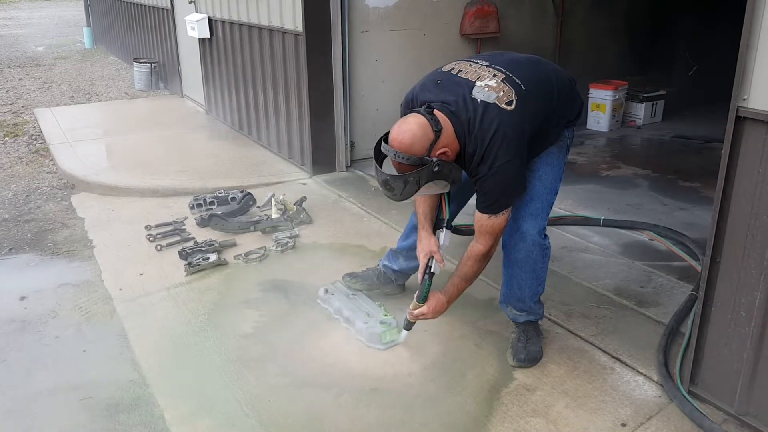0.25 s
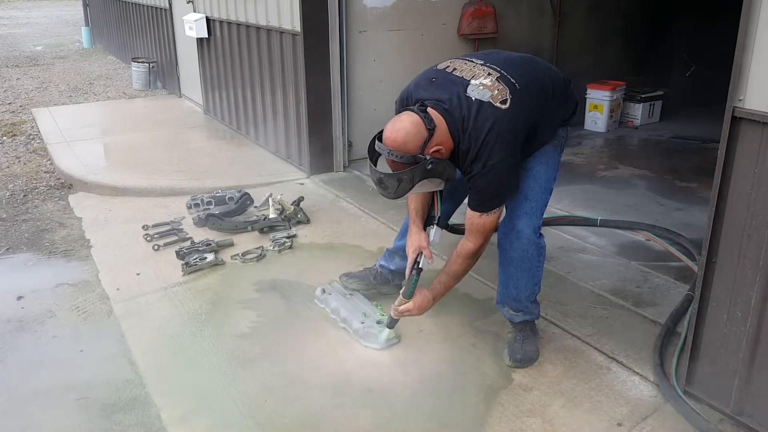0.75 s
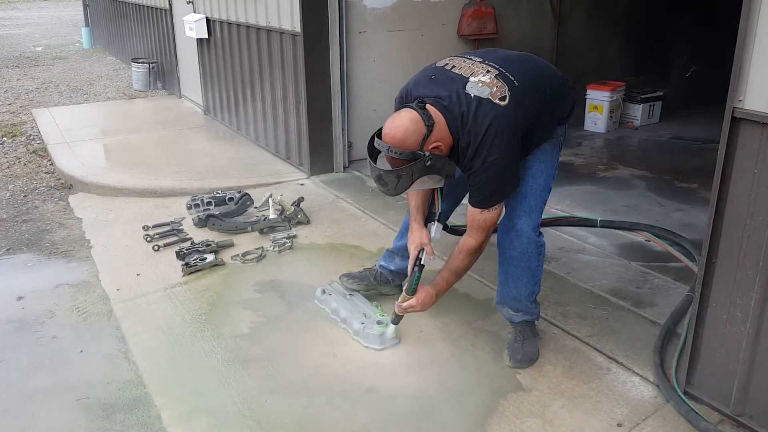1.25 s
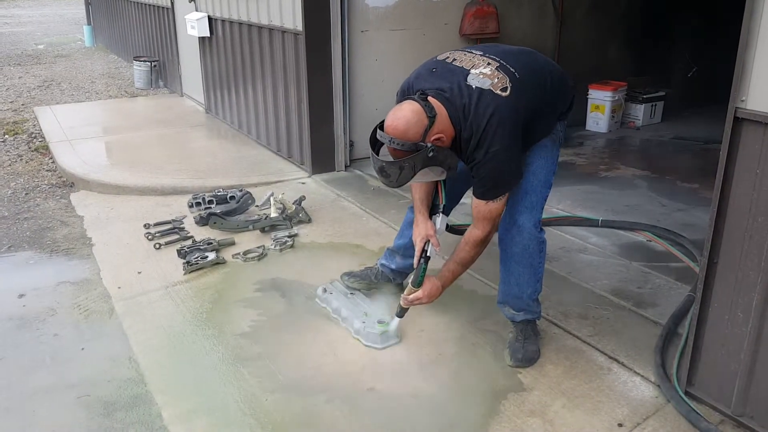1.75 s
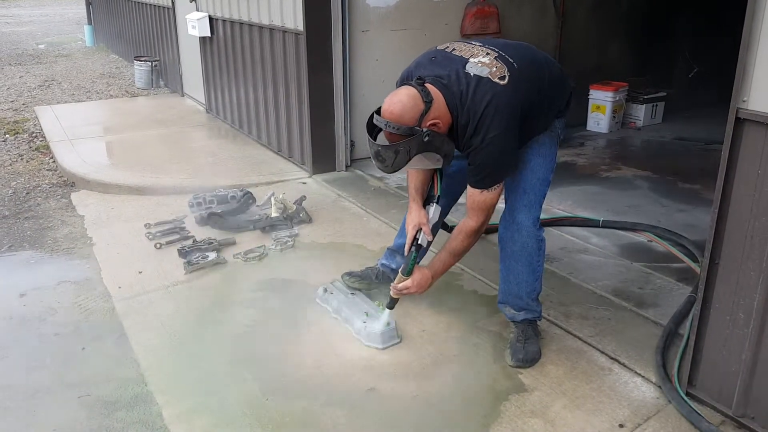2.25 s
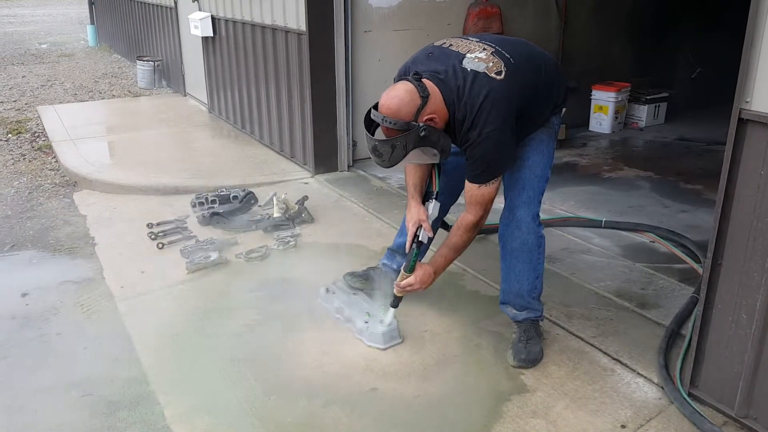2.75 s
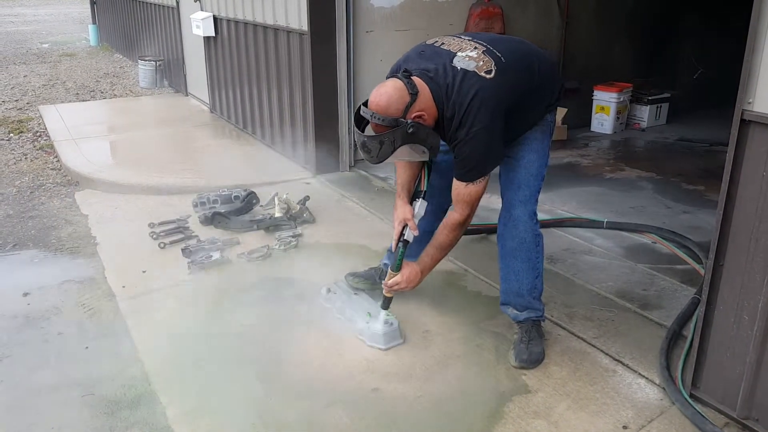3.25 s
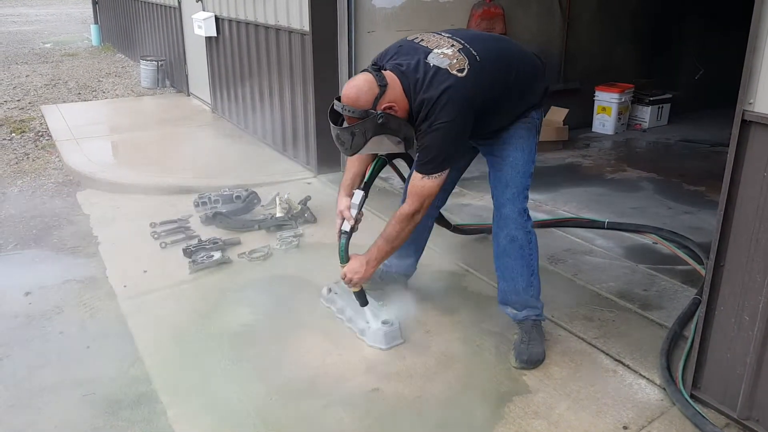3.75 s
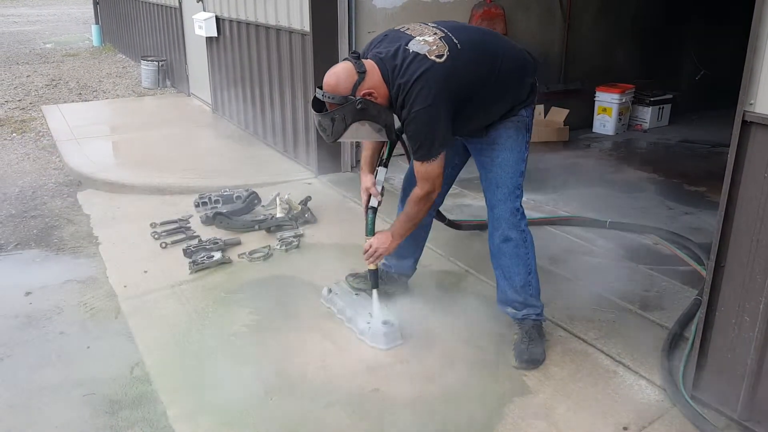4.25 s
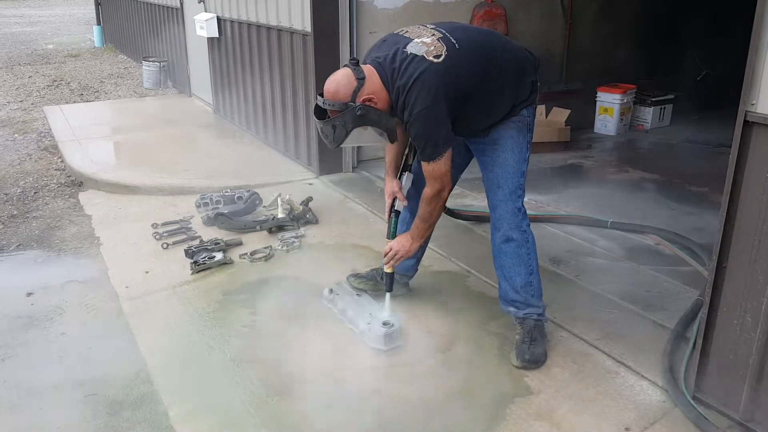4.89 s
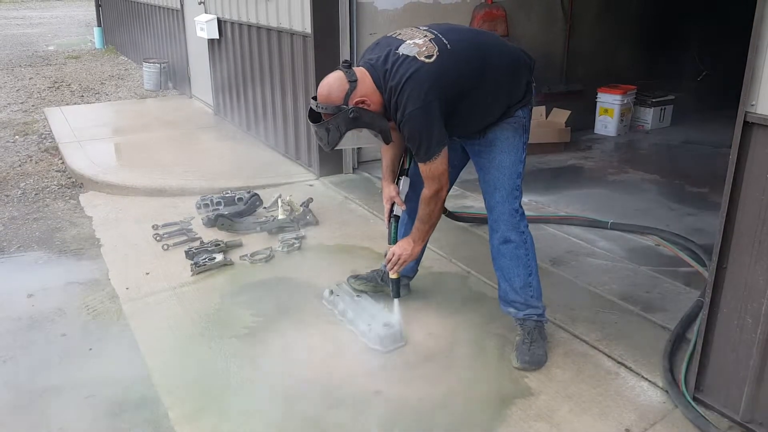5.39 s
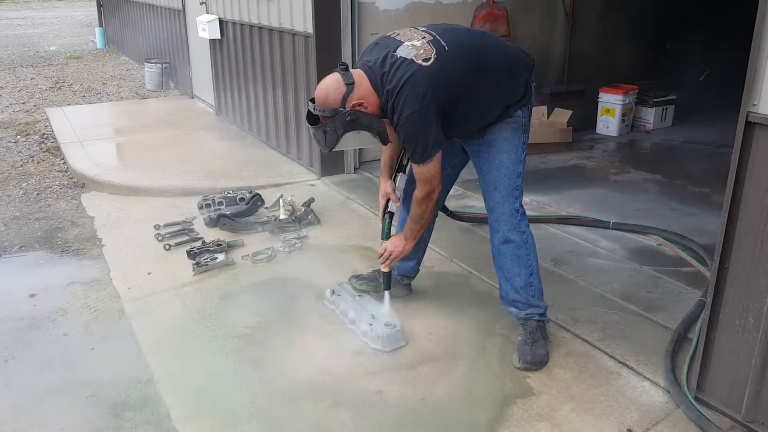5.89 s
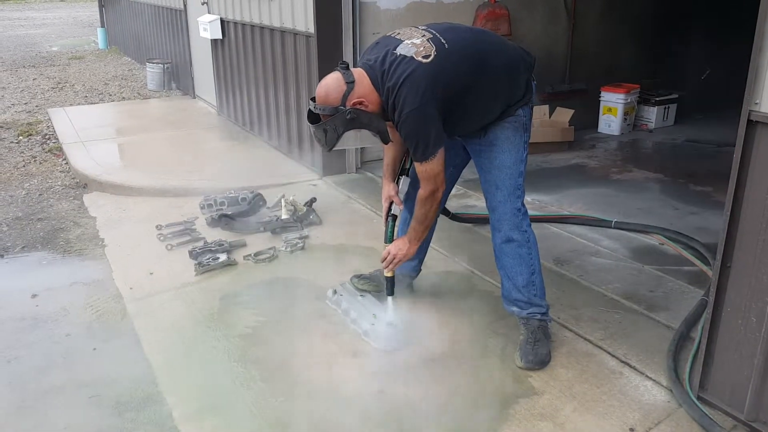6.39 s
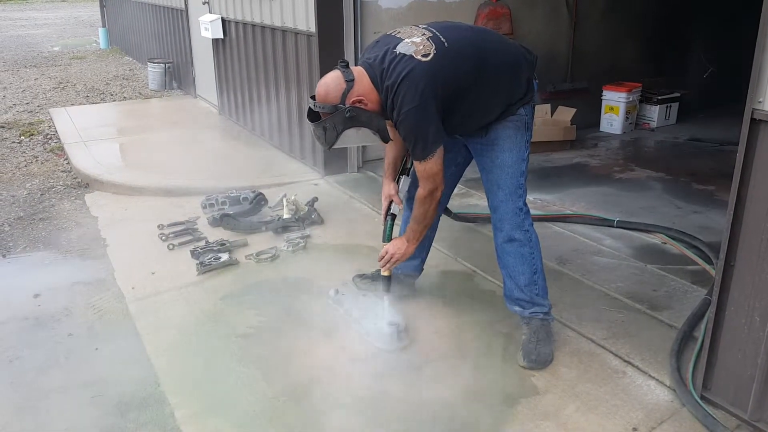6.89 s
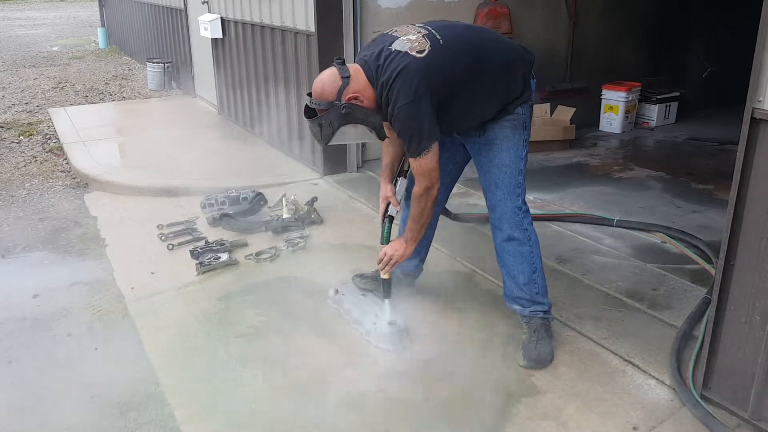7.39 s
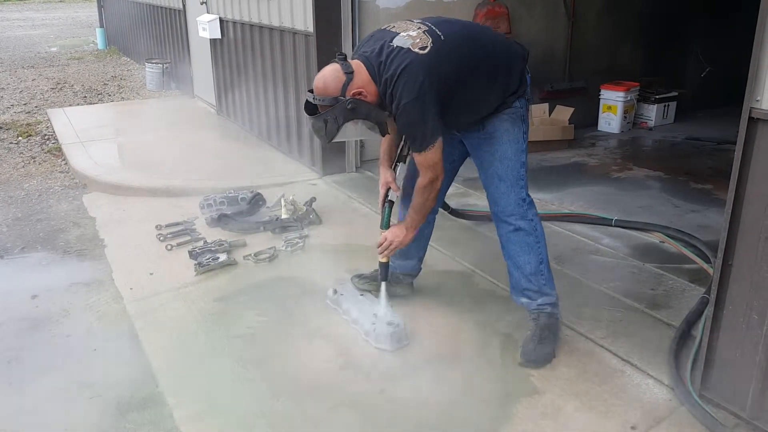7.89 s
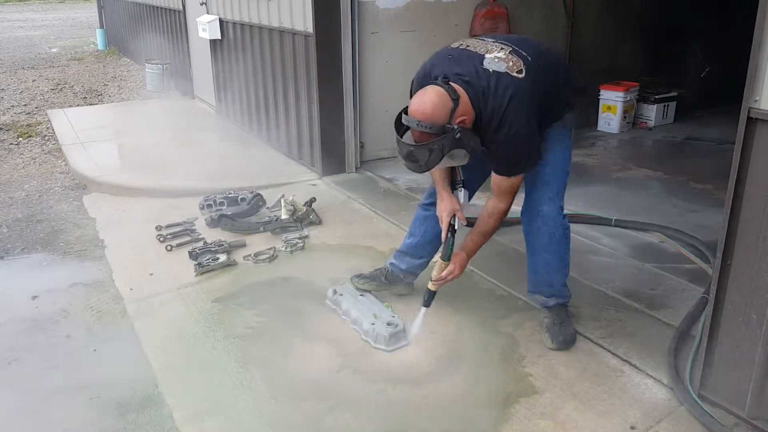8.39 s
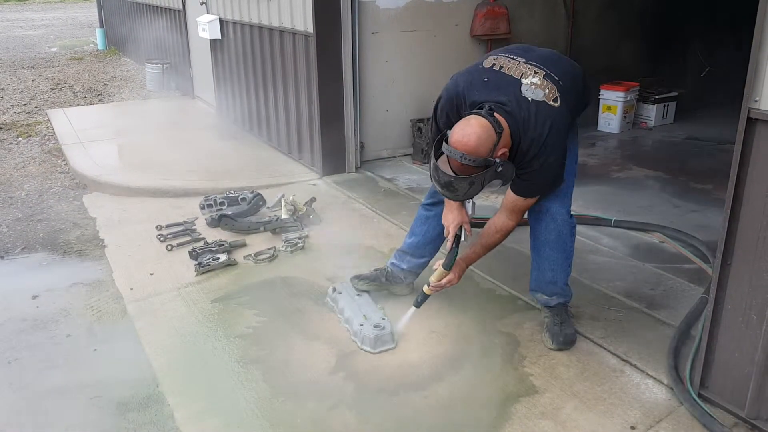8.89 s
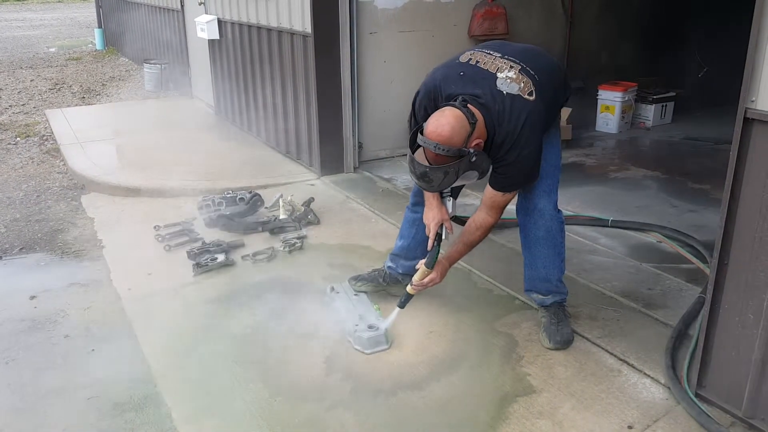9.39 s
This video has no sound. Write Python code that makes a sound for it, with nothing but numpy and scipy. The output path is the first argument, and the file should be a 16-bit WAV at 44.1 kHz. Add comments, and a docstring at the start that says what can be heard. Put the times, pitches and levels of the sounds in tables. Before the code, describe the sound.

A wet abrasive blaster screams in a harsh, wavering high hiss, swooping downward again and again over a lumpy roar and fine grit sizzle.

```python
"""The scream of a wet abrasive blaster leads, its jet on a cast metal cover on concrete outside a workshop.
Noise passes only above the bore's cut-on, a sharp edge that water in the bore pulls down; slugs choke it.
Under it lumpy noise roars on the part and the ground; on top random ticks of grit and droplets sizzle.
Place and microphone: outdoors, no distance or echo computed, the jet on the right channel only.
A faint preamplifier hiss lies on both channels, and the top is cut."""
import sys
import numpy as np
from scipy import signal
from scipy.fft import rfft, irfft
from scipy.io import wavfile
from scipy.ndimage import map_coordinates

SR = 44100
rng = np.random.default_rng(int(sys.argv[2]) if len(sys.argv) > 2 else 0)


def transcribe(signal):
    """Save signal, clipped to [-1, 1], as a 16-bit WAV file at the path in sys.argv[1]."""
    frames = np.atleast_2d(signal).T
    limited = np.clip(frames, -1, 1)
    pcm = np.round(limited * 32767).astype(np.int16)
    wavfile.write(sys.argv[1], SR, pcm)


N = 425124
T = np.arange(N) / SR
FRAME, OVERLAP = 512, 384  # samples, for the moving filters
FREQS, TIMES, _ = signal.stft(np.zeros(N), SR, nperseg=FRAME, noverlap=OVERLAP)


def undb(db):
    """Decibels to gain."""
    return 10 ** (np.asarray(db) / 20)


def curve(table, times, axis=1):
    """One column of a table, joined by straight lines in time."""
    rows = np.array(table)
    return np.interp(times, rows[:, 0], rows[:, axis])


def colour(x, points):
    """Filter by a spectrum of (f/Hz, level/dB) points, joined along log frequency."""
    hz, db = np.transpose(points)
    freqs = np.maximum(np.fft.rfftfreq(N, 1 / SR), 1)
    gain = undb(np.interp(np.log(freqs), np.log(hz), db))
    return irfft(rfft(x) * gain, N)


def sweep(x, gain):
    """A filter that moves: gain is given over FREQS and TIMES."""
    frames = signal.stft(x, SR, nperseg=FRAME, noverlap=OVERLAP)[2]
    return signal.istft(frames * gain, SR, nperseg=FRAME, noverlap=OVERLAP)[1][:N]


def unit(x, band):
    """Scale to rms 1 within a band (low Hz, high Hz)."""
    freqs = np.fft.rfftfreq(N, 1 / SR)
    inside = (freqs > band[0]) & (freqs < band[1])
    return x / np.std(irfft(rfft(x) * inside, N))


def walk(rate):
    """Random wavering in time, spread 1: noise above 2 Hz that falls off beyond rate (Hz)."""
    freqs = np.fft.rfftfreq(N, 1 / SR)
    response = (freqs > 2) / np.hypot(1, freqs / rate)
    x = irfft(rfft(rng.standard_normal(N)) * response, N)
    return x / x.std()


def ripple(width_hz, rate):
    """Peaks and dips across the spectrum that come and go, spread near 1."""
    place = np.meshgrid(FREQS / width_hz, TIMES * rate, indexing="ij")
    return map_coordinates(rng.standard_normal((256, 512)), place, order=3, mode="wrap")


def bell(hz, width_hz):
    """Shape of a resonance over FREQS, 1 at its centre, which may move."""
    return 1 / (1 + (2 * (FREQS[:, None] - hz) / width_hz) ** 2)


def resonances(table):
    """Change in dB over FREQS and TIMES of peaks or dips that each fade in and out."""
    change_db = 0
    for start, end, hz, width_hz, db in table:
        inside = np.clip(np.minimum(TIMES - start, end - TIMES) / 0.26, 0, 1)  # 0.26 s fades
        change_db = change_db + db * inside * bell(hz, width_hz)
    return change_db


def hump(times, at_s, length_s, power=2):
    """A smooth rise and fall in time, 1 at its middle and 1/e at length_s to either side."""
    return np.exp(-np.abs((times - at_s) / length_s) ** power)


# turbulence at the nozzle, before bore and resonances: f/Hz, relative level/dB
SCREAM_SPECTRUM = [(2800, 0.5), (3800, -1.5), (4500, -3.5), (5100, -1.5), (5900, -0.66), (6700, 0.2),
                   (7050, -3), (7500, -6.5), (7950, -11.5), (8450, -11.5), (9100, -15.5), (10000, -34),
                   (12000, -44)]
# gap between nozzle and part, resonating with the aim: from t/s, to t/s, f/Hz, width/Hz, change of level/dB
GAP_RESONANCES = [(0, 8.2, 6600, 260, 0.5), (0, 12, 5520, 140, 2.5), (.55, 2.1, 5880, 140, 5.5),
                  (2.05, 2.9, 5780, 170, 3.5), (2.4, 3.2, 5490, 120, 5), (3.5, 4.9, 6600, 350, 0),
                  (8.3, 8.8, 6950, 600, 6), (8.9, 9.8, 5770, 340, 5.5)]
# slugs of water that choke the nozzle: t/s, half length/s, change of level/dB
WATER_SLUGS = [(3.541, .002, -17), (3.552, .0057, -9.5), (4.907, .0058, -22), (6.768, 0.0059, -15),
               (8.397, .0054, -17), (9.157, .0056, -19)]


def scream(cut_on, grit_db):
    """Turbulence in the nozzle; the bore passes it only above the cut-on of its first cross mode."""
    turbulence = colour(rng.standard_normal(N), SCREAM_SPECTRUM)
    above_hz = FREQS[:, None] - cut_on
    passes = .5 + .5 * np.tanh(above_hz / 28)

    # the mode rings hardest just above its cut-on, and whistles there in short spells
    spells = undb(6.8 * np.interp(TIMES, T, walk(rate=6.5)))
    whistle_db = 2.34 * np.minimum(spells, 2) * bell(cut_on + 70, width_hz=200)

    # a higher cut-on and more grit both lift the upper skirt
    skirt_db = 7 * np.log(cut_on / cut_on.mean()) + 0.68 * (grit_db - grit_db.mean())
    ring_db = whistle_db + resonances(GAP_RESONANCES) + skirt_db * bell(hz=8350, width_hz=1600)

    # reflections from the part and the ground shift as the nozzle is moved
    shift_db = 1.15 * ripple(width_hz=130, rate=3.5)
    x = sweep(turbulence, passes * undb(ring_db + shift_db))

    # the oscillation saturates, which evens out its peaks
    wave = signal.hilbert(x / x.std())
    x = wave.real / np.sqrt(1 + 0.12 * np.abs(wave) ** 2)
    choke_db = sum(db * hump(T, s, length, power=2.8) for s, length, db in WATER_SLUGS)
    return unit(x, band=(4600, 7500)) * undb(choke_db)


# the clear bore's cut-on before it trembles; a surge pulls it down, sharply (1) or roundly (2)
CLEAR_HZ, SURGE_SHAPE = 4480, 1.31
# surges of water, each a downward swoop of the scream: t/s, drop of the cut-on f/Hz, half length/s
WATER_SURGES = [(0.005, 1490.0, 0.037), (0.101, 1490.0, 0.083), (0.32, 1380, 0.07), (0.443, 750.0, 0.036),
                (0.513, 1320, 0.11), (0.834, 1180.0, 0.1), (1.015, 760.0, 0.049), (1.147, 1350, 0.089),
                (1.28, 840.0, 0.12), (1.668, 900, 0.18), (1.808, 950.0, 0.078), (2.094, 900.0, 0.079),
                (2.368, 700, 0.17), (2.49, 440.0, 0.043), (2.754, 905, 0.118), (2.918, 360.0, 0.049),
                (3.073, 630.0, 0.055), (3.165, 590.0, 0.033), (3.314, 1040, 0.12), (3.682, 510.0, 0.056),
                (3.818, 710.0, 0.023), (3.933, 676, 0.16), (4.195, 1280.0, 0.08), (4.46, 680.0, 0.035),
                (4.644, 865, 0.075), (4.925, 400.0, 0.024), (5.163, 990, 0.061), (5.442, 710.0, 0.099),
                (5.579, 720.0, 0.12), (5.755, 580.0, 0.057), (5.941, 920, 0.17), (6.279, 1490.0, 0.11),
                (6.52, 1050.0, 0.071), (6.737, 1270, 0.086), (7.005, 1020.0, 0.062), (7.186, 1130.0, 0.082),
                (7.606, 463, 0.066), (7.718, 1270, 0.068), (7.979, 280.0, 0.078), (8.078, 290.0, 0.051),
                (8.36, 670.0, 0.048), (8.63, 1180, 0.067), (8.757, 430.0, 0.036), (9.016, 300.0, 0.023),
                (9.123, 340.0, 0.11), (9.464, 430.0, 0.049), (9.607, 670.0, 0.067)]


def bore():
    """Cut-on of the nozzle in Hz over TIMES: each surge lowers it, and the water film makes it tremble."""
    drop_hz = sum(hz * hump(TIMES, s, length, SURGE_SHAPE) for s, hz, length in WATER_SURGES)
    tremble = 1 + .009 * np.interp(TIMES, T, walk(rate=20))
    return (CLEAR_HZ - drop_hz) * tremble


# air and water striking the part and the ground: f/Hz, relative level/dB
ROAR_SPECTRUM = [(25, -38), (45, -33), (70, -17), (110, -8.5), (160, -2.5), (290, -2.5), (400, 0),
                 (800, -2), (1400, -4.5), (2400, -5), (3000, -1.5), (4000, -4), (9000, -10.5)]
# tones of the part that swell or dip in the roar: from t/s, to t/s, f/Hz, width/Hz, change of level/dB
PART_TONES = [(3.55, 4.35, 2210, 220, 7), (7.6, 8.4, 2720, 350, 4.5), (7.9, 9.64, 3250, 250, -2)]


def roar(cut_on):
    """The lumpy stream of air and water buffets the part, whose tones swell or dip in it."""
    lumps = undb(1.92 * walk(rate=270) + 0.72 * walk(rate=10))
    tone_db = resonances(PART_TONES) + 0.92 * ripple(width_hz=474, rate=7)

    # a dark notch runs just under the edge of the scream, deepest when the bore is clear
    notch_db = 10.0 * (cut_on / CLEAR_HZ) ** 2
    tone_db = tone_db - notch_db * bell(cut_on - 240, width_hz=240)

    # the rumble is thin at first and then gains body
    body_db = np.interp(TIMES, [1, 3, 8], [-2.2, -.3, 1.2])
    tone_db = tone_db + body_db * bell(hz=230, width_hz=150)
    x = sweep(rng.standard_normal(N) * lumps, undb(tone_db))
    return unit(colour(x, ROAR_SPECTRUM), band=(100, 2500))


# grit and droplets ticking on the metal: f/Hz, relative level/dB
SIZZLE_SPECTRUM = [(500, -58), (5000, -28), (9000, -9), (10200, -13), (11000, -8), (11700, -1),
                   (12200, 0.5), (12700, 0.2), (13300, -4), (14000, -3.5), (14700, -1), (15700, -2)]


def sizzle():
    """Countless grains and droplets tick on the metal, fed in small surges."""
    ticks = rng.standard_normal(N) * undb(1.9 * rng.exponential(size=N))
    x = colour(ticks * undb(.45 * walk(rate=35)), SIZZLE_SPECTRUM)
    x = sweep(x, undb(0.87 * ripple(width_hz=890, rate=9.5)))
    return unit(x, band=(11000, 15800))


# steady roar before the preamplifier, and the share of each gust that the scream follows
ROAR_DB, SCREAM_GUST_SHARE = -33.5, 0.29
# the roar starts this far below its steady level (dB) and is steady after this time (s)
BUILD_DB, BUILD_S = 2, 1.8
# scream before the preamplifier, as the nozzle is turned and moved: t/s, level/dB
NOZZLE_TURN = [(0, -18.5), (.8, -19), (1.2, -19), (1.8, -19.5), (2.05, -18.5), (2.7, -18.5), (3.35, -19),
               (3.8, -18), (4.23, -19), (4.5, -18.5), (5.3, -19), (5.6, -19.5), (6, -18.4), (6.35, -18.5),
               (7.6, -18.5), (8.2, -19), (8.55, -19), (9.64, -19)]
# the jet falters or spurts for a moment: t/s, half length/s, change of the roar level/dB
JET_GUSTS = [(2.185, 0.082, -2.5), (4.086, .025, -3.5), (4.43, 0.033, -1.5), (4.794, 0.038, -4.5),
             (4.93, 0.071, 3), (6.242, 0.042, -5), (6.545, 0.047, -3), (7.897, .15, -1.5), (8.37, 0.12, -2),
             (8.908, 0.097, -4.5), (9.164, .05, 1.5)]
# sizzle before the preamplifier, as the aim moves on and off the metal: t/s, level/dB
METAL_AIM = [(0, -28.5), (.22, -26.5), (.42, -28), (.7, -26.5), (1.2, -30.5), (1.55, -24.5), (2.15, -28.5),
             (2.65, -27), (3.35, -27.5), (3.65, -27), (4.45, -28), (5.55, -25.5), (6.5, -29), (6.9, -27),
             (7.9, -28), (8.2, -27), (8.95, -27.5), (9.55, -25.3)]


def scene():
    """The three sounds of the jet reach the right channel; the left is silent."""
    cut_on = bore()
    gust_db = sum(db * hump(T, s, length) for s, length, db in JET_GUSTS)
    # the feed is never quite even: the roar and the sizzle waver with it
    feed = walk(rate=7)
    scream_db = curve(NOZZLE_TURN, T) + SCREAM_GUST_SHARE * gust_db + 0.41 * walk(rate=3.3)
    build_db = -BUILD_DB * np.clip(1 - T / BUILD_S, 0, 1)
    roar_db = ROAR_DB + build_db + gust_db + 0.29 * feed
    sizzle_db = curve(METAL_AIM, T) + .3 * feed + 0.51 * walk(rate=5)

    grit_db = np.interp(TIMES, T, sizzle_db)
    jet = scream(cut_on, grit_db) * undb(scream_db)
    jet += roar(cut_on) * undb(roar_db)
    jet += sizzle() * undb(sizzle_db)
    return np.array([np.zeros(N), jet])


PREAMP_DB, HISS_DB, TOP_HZ = 5.5, -69.0, 15800


def record(dry):
    """The preamplifier raises the sound and adds the same faint hiss to both channels; the top is cut."""
    hiss_spectrum = [(30, -2), (120, 1), (1300, 9.0), (4000, 5), (8000, -7), (13000, -10)]  # f/Hz, level/dB
    hiss = colour(rng.standard_normal(N), hiss_spectrum)
    wet = undb(PREAMP_DB) * dry + undb(HISS_DB) * hiss / hiss.std()
    top_cut = signal.ellip(12, .1, 80, TOP_HZ, fs=SR, output="sos")
    return signal.sosfilt(top_cut, wet)


dry = scene()
out = record(dry)
transcribe(out)
```